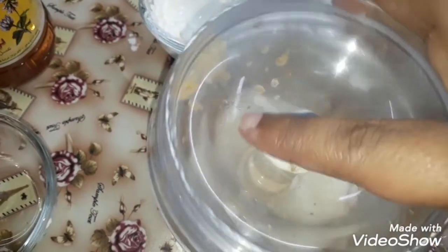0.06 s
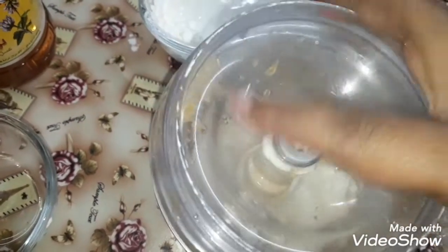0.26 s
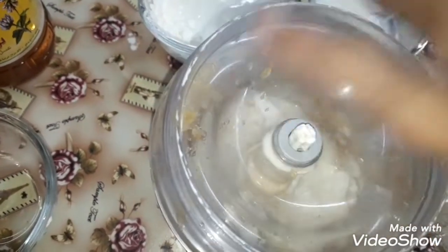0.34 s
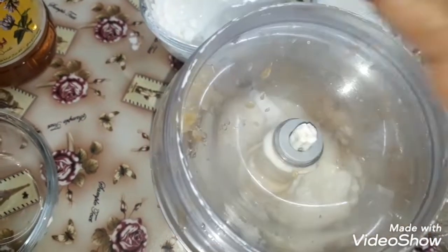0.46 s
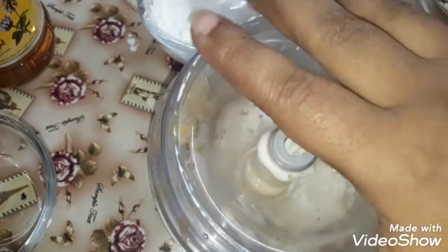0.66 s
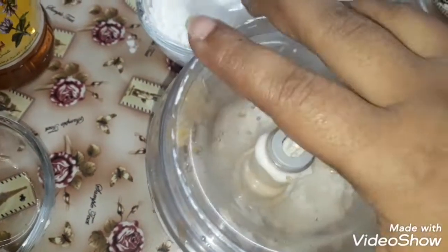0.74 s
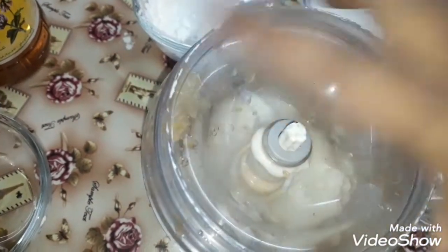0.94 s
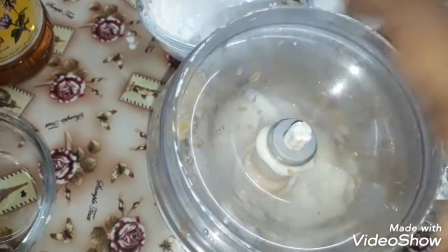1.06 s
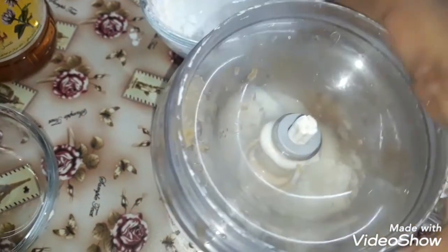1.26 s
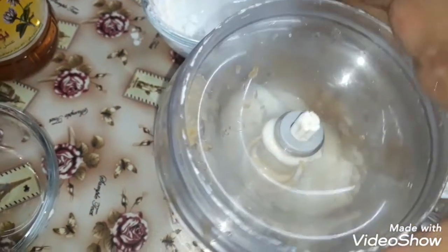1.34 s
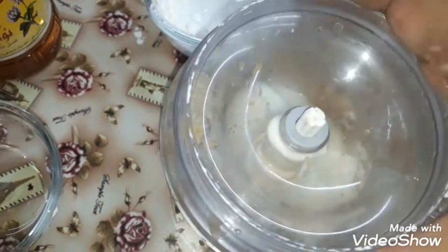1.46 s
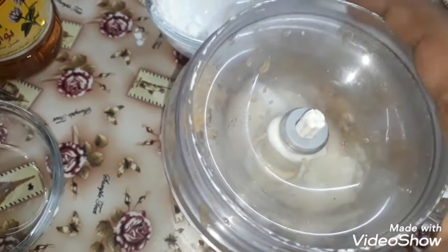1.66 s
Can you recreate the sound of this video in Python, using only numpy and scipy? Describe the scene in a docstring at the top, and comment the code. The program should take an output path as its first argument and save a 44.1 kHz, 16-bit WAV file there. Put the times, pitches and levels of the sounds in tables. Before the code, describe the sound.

Close by in a small kitchen, a plastic chopper bowl and its lid are handled: a quick cluster of clicks and hollow knocks, then a few separate taps. Fingers slide softly on the plastic over a faint appliance hum.

```python
"""Handling a plastic chopper bowl.

A plastic bowl and its lid are handled close by on a kitchen table. The lid knocks and rattles on the
rim, ringing the bowl's modes with a gritty scuff. The bowl rocks with hollow thumps, fingernails tick
and fingers slide on the plastic. A small room answers, over an appliance's hum and a quiet rush of air."""
import sys
import numpy as np
from scipy import signal
from scipy.fft import rfft, irfft, next_fast_len
from scipy.io import wavfile
from scipy.ndimage import map_coordinates

SR = 44100
rng = np.random.default_rng(int(sys.argv[2]) if len(sys.argv) > 2 else 0)


def log_audio(samples):
    """Write samples as a 16-bit WAV file to the path given in sys.argv[1]."""
    # one column per channel
    frames = np.atleast_2d(samples).T
    # limit to full scale, then quantise
    limited = np.clip(frames, -1, 1)
    pcm = np.round(limited * 32767).astype(np.int16)
    wavfile.write(sys.argv[1], SR, pcm)


N = 74970


def amp(db):
    """Decibels to gain."""
    return 10 ** (np.asarray(db) / 20)


def unit_rms(x):
    """Scale to rms 1."""
    return x / np.sqrt(np.mean(x ** 2) + 1e-20)


def along(points, hz):
    """Interpolate (frequency, value) points on a log frequency axis."""
    freqs, values = np.transpose(points)
    return np.interp(np.log(hz + 1), np.log(freqs + 1), values)


def filtered(x, response):
    """Apply a frequency response by FFT."""
    n = x.shape[-1]
    size = next_fast_len(n + 8192)
    return irfft(rfft(x, size) * response(np.fft.rfftfreq(size, 1 / SR)), size)[..., :n]


def noise(spectrum, tilt_db_oct=0):
    """Coloured noise of rms 1, optionally tilted."""
    tilted = [(hz, db + tilt_db_oct * np.log2(hz / 5000)) for hz, db in spectrum]
    return unit_rms(filtered(rng.standard_normal(N), lambda hz: amp(along(tilted, hz))))


def wobble(rate_hz):
    """Smooth random curve with knots at the given rate."""
    knots = rng.standard_normal(int(N * rate_hz / SR) + 4)
    return map_coordinates(knots, [np.arange(N) * rate_hz / SR])


def add(track, start_s, sound):
    """Mix a sound into the track."""
    i = max(round(start_s * SR), 0)
    track[i:i + len(sound)] += sound[:len(track) - i]


def event_time():
    """Time axis for the half second after a contact."""
    return np.arange(SR // 2) / SR


def decay(t60_s):
    """Exponential decay."""
    return np.exp(-np.log(1000) * event_time() / t60_s)


# Kitchen air (frequency [Hz], relative density [dB])
AIR_SPECTRUM = [(20, -23), (45, -13.5), (70, -8), (95, 2), (130, -11), (200, -1.5), (300, -3), (390, 1.5),
                (480, -8.5), (800, -8), (1200, -14), (2000, -16.5), (4000, -25), (8000, -32.5),
                (13000, -32.5), (16000, -37)]
# Appliance tones (frequency [Hz], level [dB], waver depth [ratio])
HUM_TONES = [(99.3, -66, 0.26), (388, -66.5, 0.62)]


def kitchen(air_db=-56.5, drift_db=0.14):
    """Air noise and an appliance's hum, wavering in level and phase."""
    t = np.arange(N) / SR
    hum = np.zeros(N)
    for hz, db, waver in HUM_TONES:
        level = amp(db) * np.sqrt(2) * (1 + waver * wobble(13.6))
        hum += level * np.sin(2 * np.pi * hz * t + 2 * waver * wobble(15))
    air = amp(air_db + drift_db * wobble(5.4)) * noise(AIR_SPECTRUM)
    return air + hum


# Reverberation time (frequency [Hz], t60 [s])
ROOM_DECAY = [(150, 0.17), (400, 0.24), (1000, 0.24), (2800, 0.2), (8000, 0.19)]
# Reverberation colour (frequency [Hz], gain [dB])
ROOM_EQ = [(100, 6.5), (200, 4.5), (350, 0), (700, 1), (1500, -2), (2500, 1), (4000, 1.5), (8000, 2),
           (15000, -0.5)]


def in_room(sound, send_db=0):
    """Direct sound plus the kitchen's short, dense reflections."""
    base_db, delay_s, build_s = -7.5, 0.0047, 0.001
    t = event_time()
    hz, frame_s, spectra = signal.stft(rng.standard_normal(len(t)), SR, nperseg=256)
    absorption = amp(-60 * frame_s / along(ROOM_DECAY, hz)[:, None])
    tail = signal.istft(spectra * absorption, SR, nperseg=256)[1][:len(t)]
    tail *= 1 - np.exp(-np.maximum(t - delay_s, 0) / build_s)
    tail = filtered(tail / np.linalg.norm(tail), lambda f: amp(along(ROOM_EQ, f)))
    return sound + amp(base_db + send_db) * signal.fftconvolve(sound, tail)[:len(sound)]


# Distinct bowl modes (frequency [Hz], level [dB], t60 [s])
BOWL_MODES = [(220, -24, 0.12), (380.5, 1.5, 0.026), (608, -3.5, 0.0075), (746, -9.5, 0.021),
              (906.6, -7, 0.036), (1038, -15, 0.019), (1245, -19.5, 0.041), (1578, -2, 0.018),
              (1700, -6.5, 0.014), (2320, -8, 0.011), (2698, -7, 0.041), (3510, -2.5, 0.025)]
# Weak, overlapping modes (frequency [Hz], relative density [dB])
WEAK_MODE_SPECTRUM = [(150, -28), (450, -28), (700, 11.5), (1200, -0.5), (1900, 6.5), (2400, 1.5),
                      (3300, -8), (4500, -38), (9000, -13)]


def bowl_ring(contact_s, bass_db=0, spot_hz=1000, spot_db=0, weak_db=-14):
    """One blow on the bowl: the spot struck weights a band of modes, a long contact dulls the ring."""
    spot_width_oct, bass_edge_hz, contact_loss = 0.14, 480, 1.82
    t = event_time()

    def spot_gain_db(hz):
        return spot_db * np.exp(-(np.log2((hz + 1) / spot_hz) / spot_width_oct) ** 2)

    weak_modes = filtered(noise(WEAK_MODE_SPECTRUM)[:len(t)], lambda hz: amp(spot_gain_db(hz)))
    modes = amp(weak_db) * weak_modes * decay(t60_s=0.042)
    for k, (hz, db, t60_s) in enumerate(BOWL_MODES):
        scatter_db = rng.standard_normal()
        level = amp(db + spot_gain_db(hz) - scatter_db + bass_db * (hz < bass_edge_hz))
        sign = (-1) ** (k // 5)  # neighbouring modes swing together
        modes += sign * level * decay(t60_s) * np.sin(2 * np.pi * hz * t)
    # half-sine push, weakening as the plastic gives
    push = np.sin(np.pi * np.minimum(t / contact_s, 1)) * np.exp(-contact_loss * t / contact_s)
    return signal.fftconvolve(modes, push / push.sum())[:len(t)]


# Plastic-on-plastic grit (frequency [Hz], relative density [dB])
SCUFF_SPECTRUM = [(300, -6), (1500, -18), (3000, 5.5), (4400, 0), (5750, 0.5), (6400, 0.5), (7050, 3),
                  (7600, -3), (8400, 5), (9000, 10), (9600, -4), (11200, -0.5), (13000, -15), (16000, -15)]


def scuff(t60_s, tilt_db_oct=0, rise_s=0.00027):
    """A gritty burst as two hard surfaces catch."""
    t = event_time()
    return noise(SCUFF_SPECTRUM, tilt_db_oct)[:len(t)] * decay(t60_s) * (1 - np.exp(-t / rise_s))


# Skin-on-plastic friction (frequency [Hz], relative density [dB])
SKIN_SPECTRUM = [(300, 6), (1200, 6.5), (1650, 9), (2200, 0), (2780, 7), (3100, 0), (3550, 7.5),
                 (4300, 1.5), (5200, 1), (6000, 5), (7600, -2.5), (9100, 2.5), (10200, -3), (11500, -3.5),
                 (13000, -12), (16000, -30)]
# Finger strokes (time [s], length [s], level [dB], tilt [dB/oct])
FINGER_SLIDES = [(0.046, 0.097, -60, 4.5), (0.177, 0.074, -60.5, 1.5), (0.857, .12, -67, 11),
                 (1.134, 0.023, -66, 4), (1.176, 0.094, -55, -2), (1.554, 0.06, -52, -1)]


def finger_slides(rough_db=1.5):
    """Skin hisses over plastic; quick changes of grip make it grainy."""
    out, t = np.zeros(N), np.arange(N) / SR
    for start_s, length_s, db, tilt_db_oct in FINGER_SLIDES:
        progress = np.clip((t - start_s) / length_s, 0, 1)
        swell = 4 * progress * (1 - progress)
        friction = noise(SKIN_SPECTRUM, tilt_db_oct)
        grip = amp(rough_db * wobble(500))
        out += amp(db) * swell * unit_rms(friction * grip)
    return out


# Nail contacts (time [s], level [dB], relative bowl ring [dB])
NAIL_TICKS = [(.0095, -42.5, -9.5), (0.1371, -40, -6.5), (0.1916, -50, -14), (0.2584, -44.5, -11),
              (0.4222, -51.5, -18)]


def nail_ticks():
    """Nails tick on the lid and ring the bowl brightly."""
    out = np.zeros(N)
    for start_s, db, ring_db in NAIL_TICKS:
        tick = scuff(t60_s=0.025)
        ring = bowl_ring(contact_s=0.00029, spot_hz=3500, spot_db=10.5)
        add(out, start_s, amp(db) * (tick + amp(ring_db) * ring))
    return out


# Rocking on the table or under a fingertip (time [s], level [dB], pitch [Hz], t60 [s])
BOWL_THUMPS = [(0.015, -34.5, 386, 0.051), (0.1402, -30, 287, 0.033), (0.175, -41.5, 288, 0.076),
               (0.2223, -27.5, 325.6, 0.074), (0.2617, -25, 335, 0.087), (0.3125, -20, 208.3, 0.029),
               (.404, -24, 209, 0.034), (0.4646, -35, 353, 0.015), (0.7176, -30.5, 273, 0.051),
               (.789, -41.5, 368, 0.063), (1.2726, -33, 302, 0.022), (1.6091, -24, 256, 0.014)]


def bowl_rocking(rise_s=0.0011, tap_db=-9):
    """Soft contacts move the hollow bowl as a whole; the grip sets its pitch."""
    out, t = np.zeros(N), event_time()
    for start_s, db, hz, t60_s in BOWL_THUMPS:
        hollow = np.sin(2 * np.pi * hz * t) * decay(t60_s) * (1 - np.exp(-t / rise_s))
        tap = amp(tap_db) * bowl_ring(contact_s=0.0011)
        add(out, start_s, in_room(amp(db) * (hollow + tap), send_db=-2))
    return out


# Lid on rim (time [s], ring level [dB], contact [s], bass modes [dB], spot band [Hz], spot gain [dB],
# weak modes [dB], room send [dB], scuff level [dB], scuff tilt [dB/oct], scuff t60 [s])
LID_KNOCKS = [(0.2509, -17, 0.00071, -6, 770, 7.5, -12, -2.5, -50, -2, 0.028),
              (0.3096, -14, 0.00038, 1, 1820, -2, -5.5, -4, -30, -3.5, 0.032),
              (0.3991, -27, 0.00053, -8, 3530, 8.5, -47, -2, -48.5, -1, 0.035),
              (0.4293, -31.5, 0.00063, 1.5, 1210, 12, -4.5, -3.5, -54, 10, 0.013),
              (0.6529, -15, 0.00053, -3, 618, -17, -14, -2, -35, -1.5, 0.047),
              (0.732, -31, 0.00071, -3, 600, 0, -28, 1, -55, 0, 0.024),
              (1.2693, -27.5, 0.00035, -10, 546, 20, -10.5, -3, -32, -8, 0.031),
              (1.6047, -41.5, 0.00041, 8.5, 2690, 12, -4, -2, -46, -5, 0.031),
              (1.6104, -36, 0.00073, 3, 686, 8, -26, 0.5, -53, 5, 0.018)]


def lid_knocks():
    """Each knock of the lid rings the bowl and scuffs the rim."""
    out = np.zeros(N)
    for (start_s, ring_db, contact_s, bass_db, spot_hz, spot_db,
         weak_db, send_db, scuff_db, tilt_db_oct, scuff_t60_s) in LID_KNOCKS:
        ring = amp(ring_db) * bowl_ring(contact_s, bass_db, spot_hz, spot_db, weak_db)
        grit = amp(scuff_db) * scuff(scuff_t60_s, tilt_db_oct)
        add(out, start_s, in_room(ring + grit, send_db))
    return out


def radiated(x, cutoff_hz=220):
    """A small bowl radiates little deep bass: second-order high-pass."""
    def highpass(hz):
        s = 1j * hz / cutoff_hz
        return s ** 2 / (1 + np.sqrt(2) * s + s ** 2)

    return filtered(x, highpass)


def scene():
    """All sources centred, with a trace of wide hiss."""
    handling = lid_knocks() + bowl_rocking() + in_room(nail_ticks() + finger_slides())
    mid = radiated(handling) + kitchen()
    side = amp(-73) * noise([(30, 19.5), (300, 14.5), (2000, 18), (15000, 10.5)])
    return np.array([mid + side, mid - side])


def record(dry):
    """Steep low-pass band limit."""
    cutoff_hz = 15700
    return filtered(dry, lambda hz: 1 / np.sqrt(1 + (hz / cutoff_hz) ** 120))


dry = scene()
out = record(dry)
log_audio(out)
```